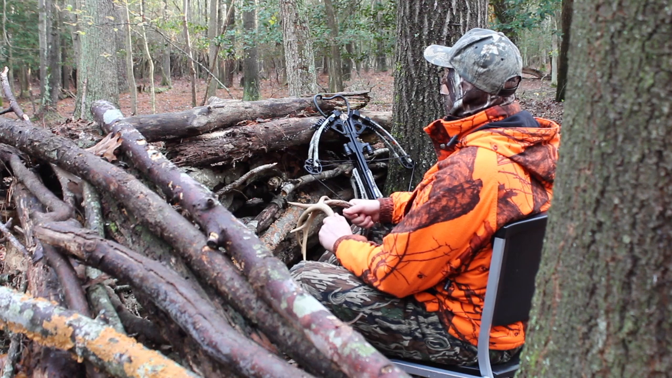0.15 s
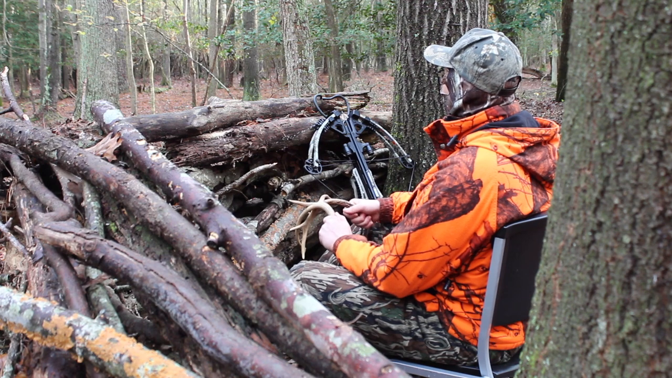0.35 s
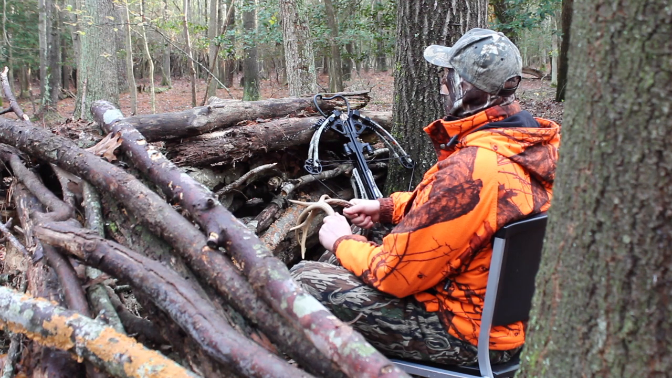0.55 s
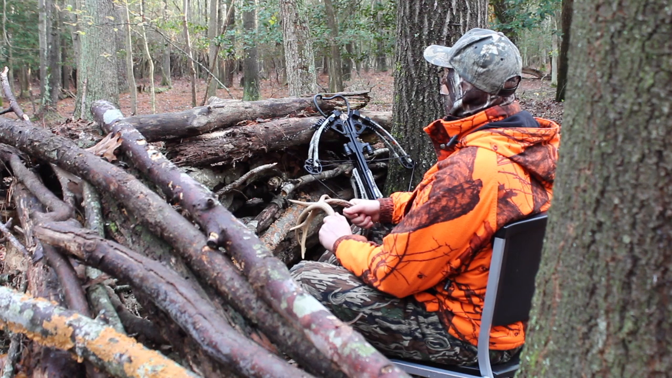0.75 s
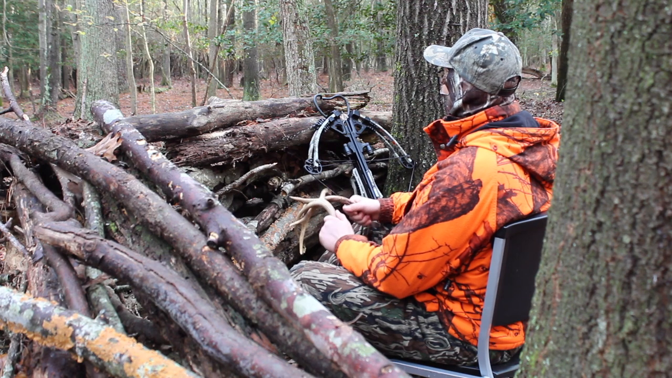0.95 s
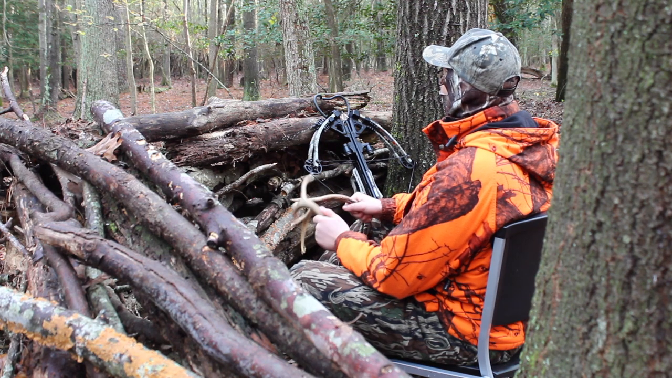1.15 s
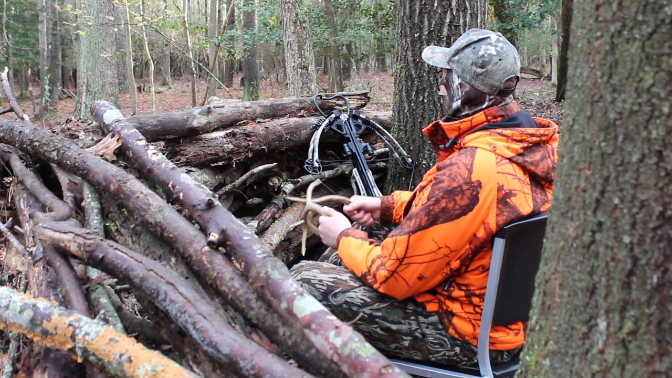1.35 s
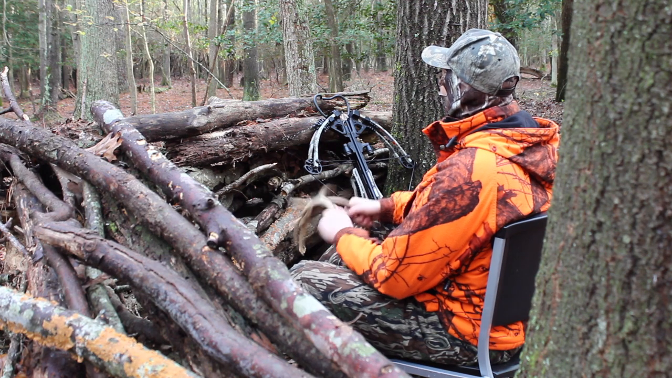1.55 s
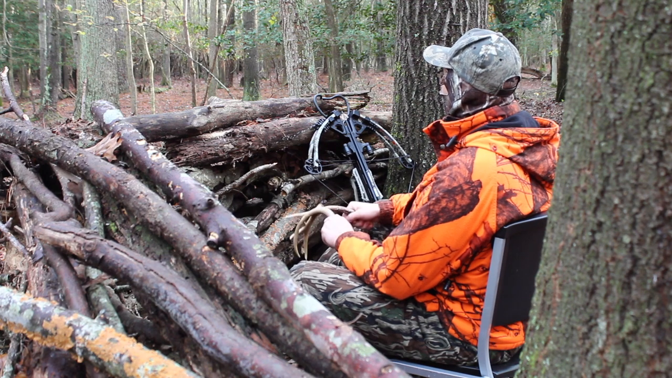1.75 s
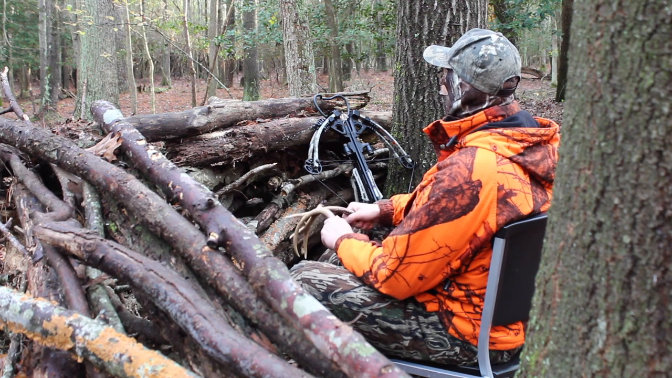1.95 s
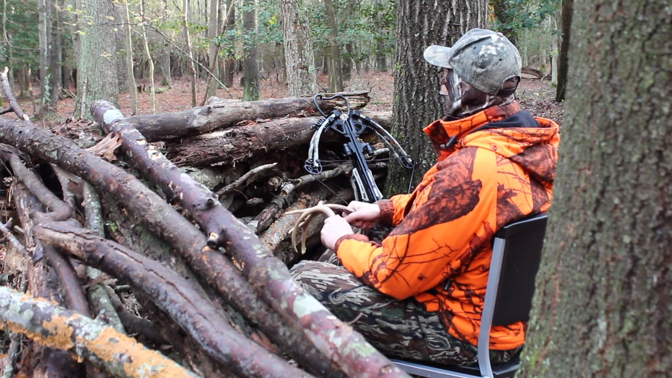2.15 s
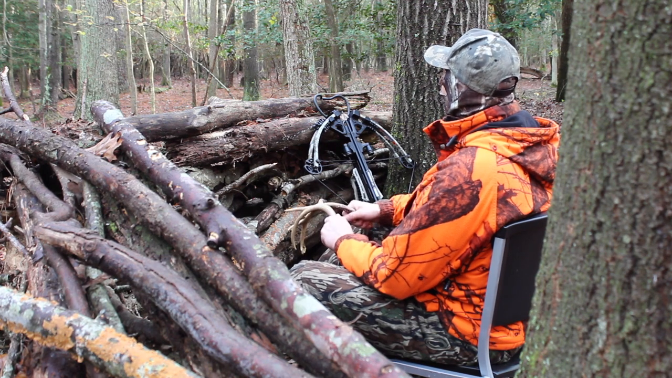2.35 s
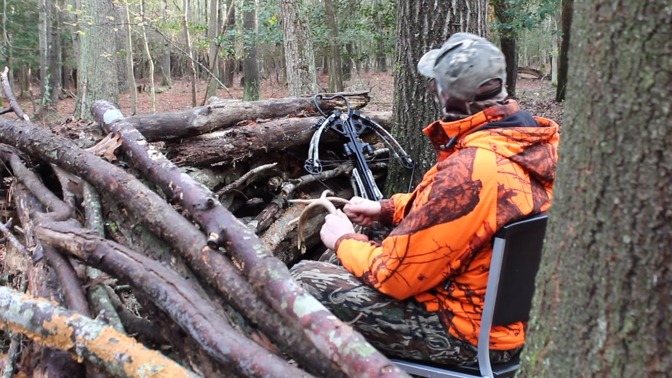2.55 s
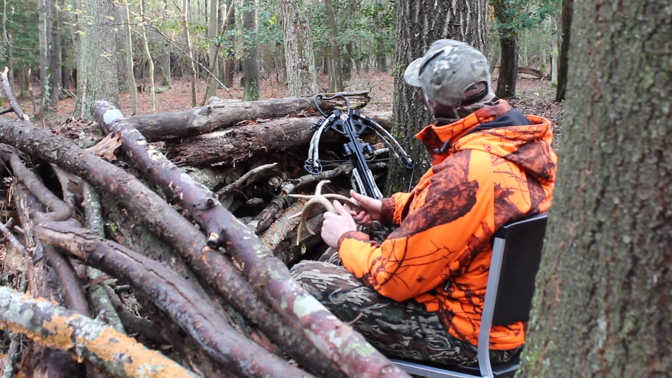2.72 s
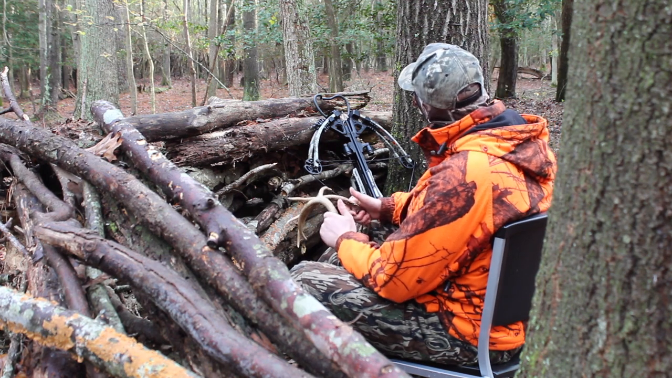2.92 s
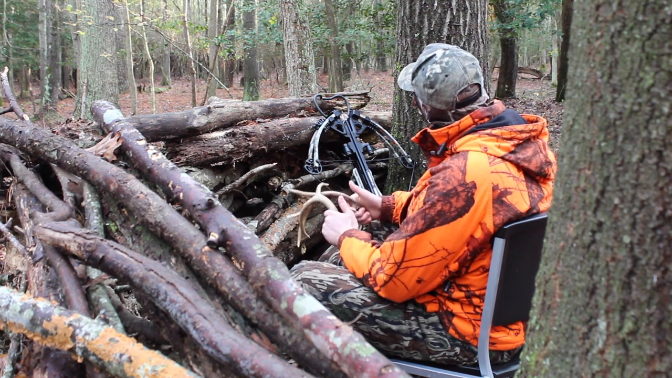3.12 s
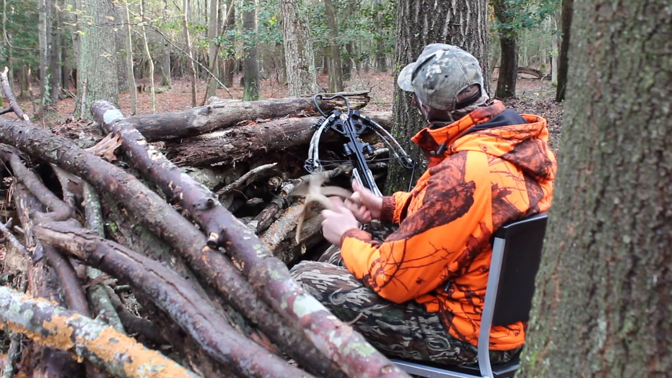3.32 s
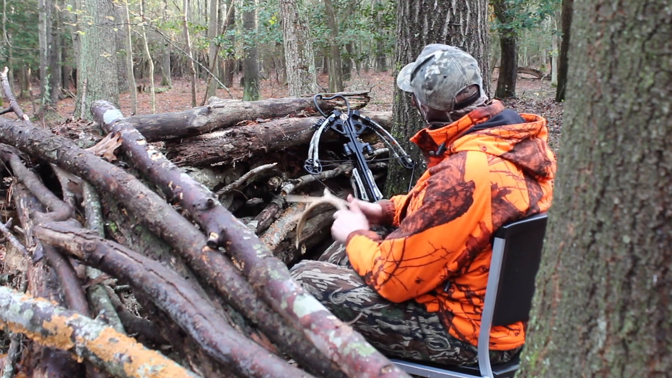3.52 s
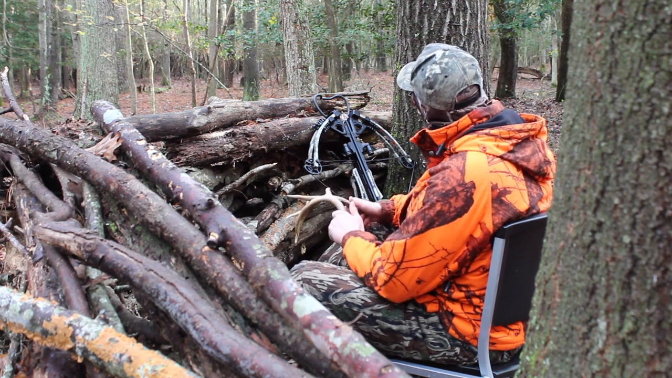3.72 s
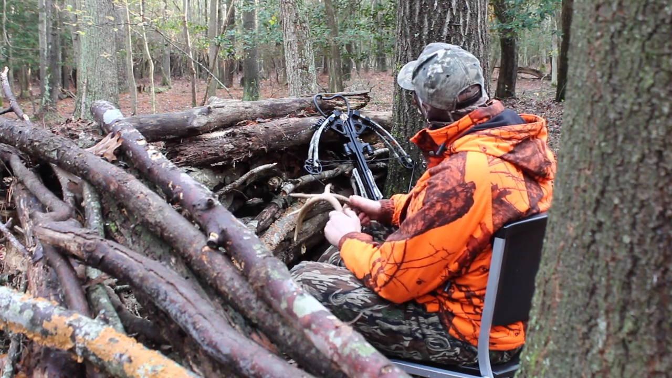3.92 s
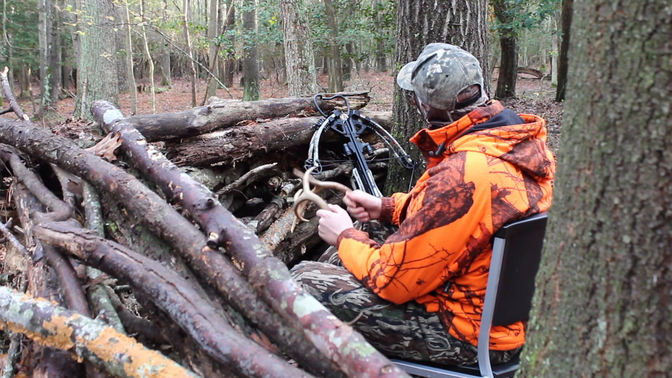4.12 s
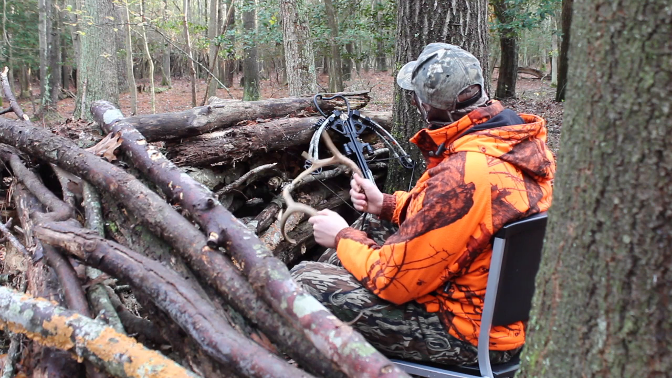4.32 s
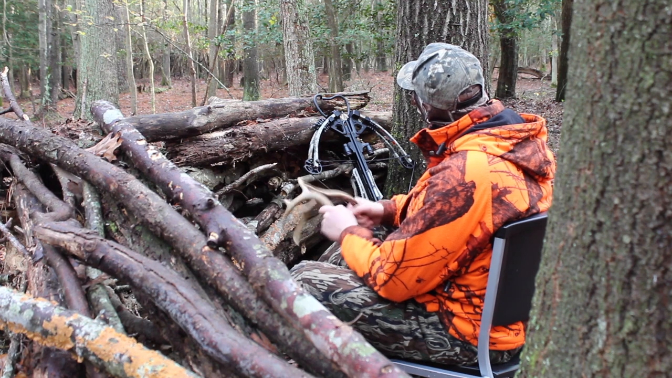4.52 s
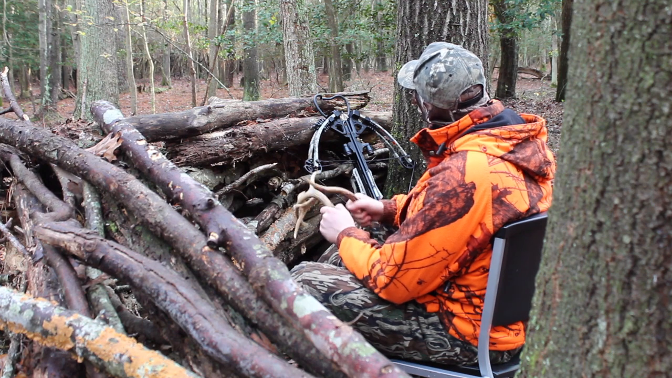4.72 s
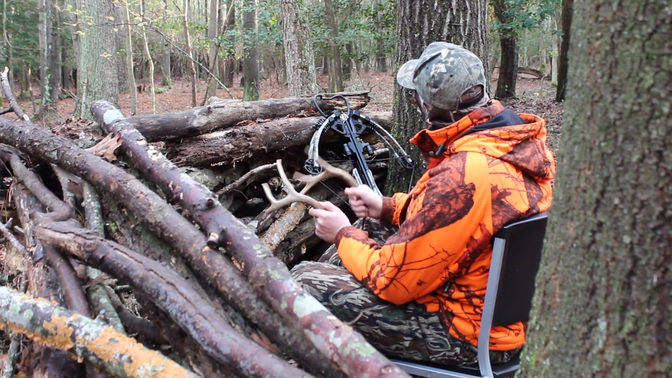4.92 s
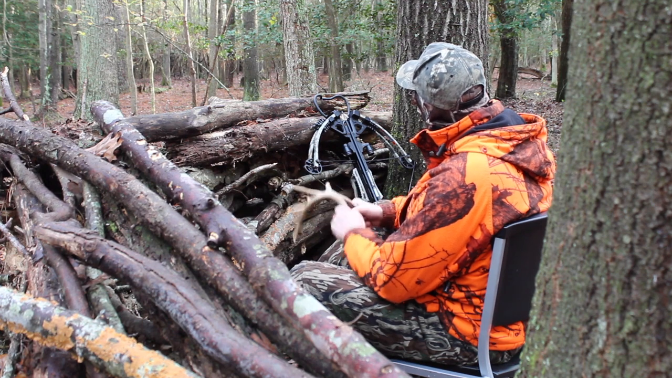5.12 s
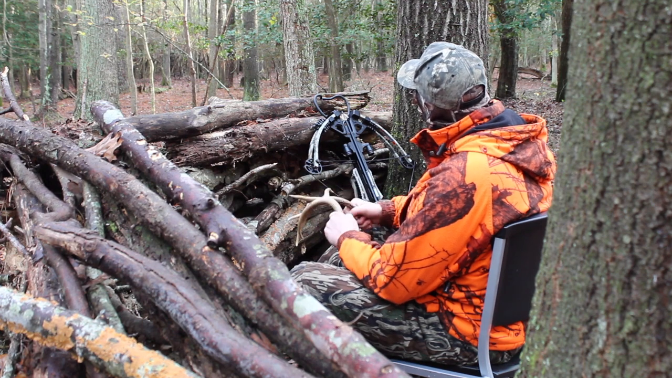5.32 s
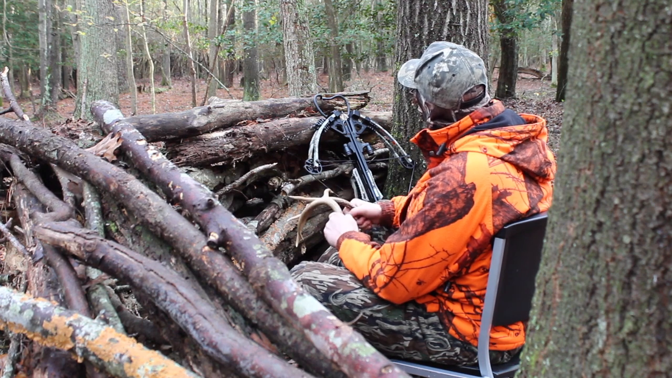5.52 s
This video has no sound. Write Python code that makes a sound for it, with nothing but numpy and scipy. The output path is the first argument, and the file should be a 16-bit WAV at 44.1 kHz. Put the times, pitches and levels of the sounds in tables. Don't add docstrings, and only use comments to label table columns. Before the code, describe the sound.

A quiet forest, picked up in mono with the antlers fairly close. For the first second there is only very soft road and leaf hush, a low passing rumble that fades after 0.6 s, and a tiny thin bird chip at 0.13 s. From 1.0 s antlers touch and slide faintly; clacks cluster at 1.3-1.4 s, with a stronger crack at 1.6 s. After a pause, lighter ticks come around 2.6 and 2.9 s, with a second, fainter chip. Clacks resume at 3.25 and 3.35 s, then a hard double at 3.5 s, lighter ones at 4.0 and 4.2 s, a strong cluster at 4.55 s with scrapes after it, and a softer tick at 4.8 s. The loudest, brightest burst lands at 5.14-5.2 s, then quiet to about 5.7 s. Each hit is dry, bony and brief, with scattered log reflections and a faint tree haze. A distant engine drone rises slightly after 3.6 s.

```python
import sys
import numpy as np
from scipy import signal
from scipy.io import wavfile
from scipy.ndimage import uniform_filter1d, minimum_filter1d

SR = 44100
rng = np.random.default_rng(int(sys.argv[2]) if len(sys.argv) > 2 else 0)


def nominal_scale(level):
    x = np.asarray(level, float) / 20
    return 10 ** x


def to_wav(s):
    ch = np.atleast_2d(s).T
    pcm = np.round(np.clip(ch, -1, 1) * 32767)
    wavfile.write(sys.argv[1], SR, pcm.astype(np.int16))


N = 250047


def at_hz(points, hz):
    table_hz, values = np.transpose(points)
    return np.interp(np.log(hz), np.log(table_hz), values)


def rms_one(x):
    return x / np.sqrt(np.mean(x ** 2) + 1e-20)


def band(x, low_hz, high_hz):
    edges_hz = [low_hz, min(high_hz, .45 * SR)]
    return signal.sosfilt(signal.butter(2, edges_hz, "band", fs=SR, output="sos"), x)


def dull(x, hz):
    return signal.sosfilt(signal.butter(6, hz, fs=SR, output="sos"), x)


def resonance(x, hz, width_hz):
    r = np.exp(-np.pi * width_hz / SR)
    top = (1 - r * r) / 2
    return signal.lfilter([top, 0, -top], [1, -2 * r * np.cos(2 * np.pi * hz / SR), r * r], x)


def drift(rate):
    r = np.exp(-80 * np.pi * rate / SR)
    slow = signal.lfilter([1], [1, -2 * r, r * r], rng.standard_normal(N // 40 + 2002))[2000:]
    return np.interp(np.arange(N) / 40, np.arange(len(slow)), rms_one(slow))


# mode_hz, width_hz, level_db
BONE_MODES = [(791, 110, -28), (1380, 29, -31.5), (1700, 33, -6), (2860, 170, 11.5), (3640, 510, -14.5),
              (4020, 16, 7), (5000, 360, 5), (5080, 110, 15), (6040, 79, -12.5), (6200, 210, 3.5),
              (6650, 720, 2), (6763, 44, 10), (8250, 170, 0), (8400, 150, -18.5), (9600, 78, -32),
              (9340, 86, -11), (10100, 65, -15), (10400, 240, -17.5), (11200, 100, -36),
              (11600, 150, -30.5)]


def bone(force, widen, spot_hz, focus_db):
    strengths_db = 4 * rng.standard_normal(len(BONE_MODES))
    ringing = 0
    for k, (hz, width_hz, db) in enumerate(BONE_MODES):
        level_db = db + strengths_db[k] - focus_db * np.log2(hz / spot_hz) ** 2
        sign = (-1) ** k
        ringing = ringing + sign * nominal_scale(level_db) * resonance(force, hz, widen * width_hz + 150)
    return ringing


# start_s, peak_db, tine_hz (loudest), thud_db (beam), dying_s (60 dB)
STRIKES = [(1.29, -29, 5470, -22, 0.02), (1.3349, -42, 3810, -7.5, 0.015),
           (1.3687, -16.5, 5080, -24.5, .018), (1.6053, -11, 4020, -19, 0.042),
           (2.5955, -33.5, 4076, -18, 0.011), (2.613, -22.5, 5200, -27, 0.018),
           (2.8799, -43, 3400, -13, 0.039), (3.2429, -16.5, 4870, -18.5, 0.04),
           (3.3543, -28, 5060, -33, 0.046), (3.4755, -23.5, 5860, -17, 0.049),
           (3.513, -7, 6420, -21, 0.023), (3.5142, -8.5, 6360, -32, 0.011),
           (4.0132, -22.5, 6830, -29, 0.023), (4.228, -29.5, 6590, -28, 0.027),
           (4.2464, -30, 6920, -20.5, .025), (4.5343, -9, 5100, -22.5, 0.03),
           (4.5557, -12, 4600, -26, 0.027), (4.5616, -15, 5800, -21, 0.057),
           (4.7854, -29.5, 4140, -17, 0.036), (5.1426, -8, 4750, -19.5, 0.034),
           (5.1445, 1, 6160, -28, 0.017), (5.1692, -16, 5110, -24, 0.014),
           (5.197, -15.5, 5700, -44.5, 0.013)]
# start_s, peak_db, tine_hz (loudest), thud_db (beam)
TOUCHES = [(1.046, -61, 3805, -1.5), (1.3813, -23, 6020, -17), (1.3856, -24.5, 3070, -26),
           (1.3962, -30.5, 3320, -20), (1.4028, -34, 3640, -8.5), (1.517, -51.5, 3500, -12.5),
           (1.588, -45, 2400, -5), (1.597, -52.5, 2600, -8.5), (1.62, -26, 5080, -4),
           (1.6304, -34, 2900, -17), (2.606, -54, 4070, -17), (2.715, -55.5, 4990, -11),
           (3.5175, -16.5, 3800, -14), (3.531, -25, 4240, -10.5), (4.0136, -32, 3970, -34.5),
           (4.027, -42, 3400, -35), (4.2259, -42, 4650, -14), (4.5354, -10.5, 6345, -33.5),
           (4.5738, -27.5, 4640, -18.5), (4.6231, -34.5, 3072, -4), (4.7108, -56, 5285, 1),
           (4.7195, -52, 2790, -0.5), (4.878, -41.5, 4360, -22.5), (5.147, -13, 6500, -29.5),
           (5.169, -25, 7500, -29.5), (5.175, -27, 5320, -20.5)]
# note_hz, level_db
BEAM_NOTES = [(1400, -1.5), (1790, -3.5), (2150, 2)]


def clacks():
    start_offset_s, touch_dying_s = .0006, 0.037
    out, energy, t, blow = np.zeros(N + 4000), np.zeros(N), np.arange(4000) / SR, 0
    for s, db, hz, thud_db, t60 in sorted(STRIKES + [(*row, touch_dying_s) for row in TOUCHES]):
        spread_db = 3.5 * np.minimum(rng.exponential(1, 4000), 3)
        echoes = rng.standard_normal(4000) * nominal_scale(spread_db - 19.0)
        force = echoes * nominal_scale(-60 * t / np.clip(t60, .006, .12))
        force[0] = 1

        modes = rms_one(band(bone(force, 0.13, hz, focus_db=-5.0), 3200, 6700))
        tine = nominal_scale(2.0) * rms_one(resonance(force, hz, 380))
        crack = nominal_scale(4.0) * rms_one(band(force * nominal_scale(-500 * t), 0.66 * hz, min(1.6 * hz, 8500)))
        body = band(dull(modes + tine + crack, 8600), 2200, 10000)

        notes = 0
        for beam_hz, level_db in BEAM_NOTES:
            notes = notes + nominal_scale(level_db + 5 * rng.standard_normal()) * resonance(force, beam_hz, 200)
        beam = rms_one(notes) + nominal_scale(0.5) * rms_one(band(force, 600, 3000))
        beam = band(band(beam, 370, 2800), 370, 2800)
        grip = rms_one(band(resonance(force, 420, 450), 250, 600))
        beam = beam + nominal_scale(-16 + .6 * db) * grip

        edge_db = -22 + 7 * np.log2(hz / 5000) + 0.17 * (db + 16)
        bright = band(force * nominal_scale(-1500 * t), 9300, 13000)
        edge = nominal_scale(edge_db + 4.0) * rms_one(dull(bright, 10000))
        first_contact = rms_one(band(force * nominal_scale(-2500 * t), 10500, 14000))
        edge = edge + nominal_scale(edge_db - 12.5) * first_contact

        hit = nominal_scale(db) * (body + nominal_scale(thud_db + 6.5) * beam + edge) / np.abs(body).max()
        at = round((s + start_offset_s) * SR)
        out[at:at + 4000] += hit
        blow = blow if at - blow < 300 else at
        energy[blow] += np.sum(hit ** 2)
    return out[:N], np.sqrt(energy)


# start_s, peak_db, note_hz, dying_s (60 dB)
KNOCKS = [(1.622, -42, 1040, 0.048), (3.2435, -47.5, 620, 0.049), (3.365, -53, 1630, 0.17),
          (3.515, -33, 2870, .02), (4.014, -37.5, 3400, 0.036), (4.229, -45, 3525, 0.033),
          (4.6235, -38.5, 1790, 0.023), (4.628, -49, 890, 0.075), (4.643, -48, 1400, .02),
          (1.606, -23.5, 3980, 0.022), (4.5352, -7.5, 4990, 0.016), (4.5349, -8.5, 7580, 0.0099),
          (4.562, -16.5, 5840, .02), (4.574, -27.5, 4830, 0.027), (5.143, -21, 1760, 0.033),
          (5.146, -41.5, 622, 0.035), (5.145, -14, 8050, .015)]


def knocks():
    out, taps, t = np.zeros(N), np.zeros(N), np.arange(4000) / SR
    for s, db, hz, t60 in KNOCKS:
        force = nominal_scale(-17 - 60 * t / t60) * rng.standard_normal(4000)
        force[0] = 1
        note = band(resonance(force, hz, 160 + 0.013 * hz), .6 * hz, 1.3 * hz)
        note = dull(note, 9000)
        note = nominal_scale(db) * note / np.abs(note).max()
        at = round(s * SR)
        out[at:at + 4000] += note
        taps[at] += np.linalg.norm(note)
    return out, taps


# start_s, end_s, level_db, first_hz, last_hz (colour)
SLIDES_IN = [(1.009, 1.056, -66, 3460, 4200), (1.028, 1.092, -63.5, 6000, 7260),
             (1.186, 1.226, -56, 5000, 6600), (1.2, 1.234, -50, 5600, 4300),
             (1.205, 1.232, -57, 2350, 2830), (1.556, 1.603, -58, 2980, 5210),
             (3.21, 3.242, -63, 6000, 4500), (3.479, 3.503, -43.5, 5460, 4924),
             (4.591, 4.622, -46, 4800, 2724), (4.688, 4.745, -65.5, 2430, 3400),
             (4.836, 4.871, -52, 2400, 4800), (4.866, 4.886, -55, 4440, 4500),
             (4.829, 4.871, -56, 2200, 2870)]
# start_s, end_s, level_db, first_hz, last_hz (colour)
SLIDES_OUT = [
    (1.062, 1.186, -67, 2760, 3000),
    (1.1, 1.155, -65, 4042, 4100),
    (3.362, 3.413, -50.5, 3260, 3700),
    (4.621, 4.663, -55.5, 2090, 1750),
]


def rubs():
    slips_per_s, slip_spread_db = 3500, 2
    rise_db, fall_db, let_go_db_per_s = 18.5, 19, 2800
    out = np.zeros(N)
    wander = .05 * drift(25)
    clumps_db = 2.2 * drift(120)
    colours_hz = np.geomspace(1700, 7500, 14)
    slides = [(row, True) for row in SLIDES_IN] + [(row, False) for row in SLIDES_OUT]
    for (start, end, db, first_hz, last_hz), swells in slides:
        i = np.arange(round(start * SR), round(start * SR) + 7000)
        done = np.clip((i / SR - start) / (end - start), 0, 1)
        spread_db = slip_spread_db * np.minimum(rng.exponential(1, len(i)), 3)
        sizes = rng.standard_normal(len(i)) * nominal_scale(spread_db)
        slope_db = rise_db * (1 - done) if swells else fall_db * done
        level_db = db - slope_db - let_go_db_per_s * np.maximum(i / SR - end, 0)
        slips = rms_one((rng.random(len(i)) < slips_per_s / SR) * sizes)
        slips = slips * nominal_scale(level_db + clumps_db[i])

        spot = np.log(first_hz + (last_hz - first_hz) * done) + wander[i]
        colour = 0
        for hz in colours_hz:
            nearness = nominal_scale(9 - 200 * (np.log(hz) - spot) ** 2)
            colour = colour + nearness * resonance(slips, hz, 360)
        hiss = band(slips, 1300, 8500)
        out[i] += colour + nominal_scale(-7) * hiss + nominal_scale(-8) * bone(slips, 0.52, 5000, focus_db=-1.5)
    return dull(out, 8600) + nominal_scale(-19.5) * band(out, 9200, 11500)


# band_hz, t60_s
FOREST_T60 = [(500, .4), (1500, 0.12), (4000, 0.91), (8000, 0.52), (14000, .35)]
# band_hz, gain_db
FOREST_GAIN = [(500, -45), (1500, -33.5), (2500, -36), (5000, -41.5), (8000, -35.5), (10000, -59),
               (12000, -68.5), (14000, -79.5)]
# mode_hz, width_hz, level_db
HAZE_MODES = [(4050, 75, 0), (5080, 62, 0), (5250, 120, -3), (6080, 220, -3), (6630, 62, -5),
              (7220, 82, -7)]


def forest(ticks):
    t, edges = np.arange(SR) / SR, 400 * 2 ** np.arange(0, 5.4, 1 / 3)
    white, tail = rng.standard_normal((2, SR)), 0
    for k, (low, high) in enumerate(zip(edges, edges[1:])):
        hz = np.sqrt(low * high)
        decay_db = at_hz(FOREST_GAIN, hz) - 60 * t / at_hz(FOREST_T60, hz)
        tail = tail + band(white[k % 2], low, high) * nominal_scale(decay_db)
    tail = tail * (1 - np.exp(-(t / 0.024) ** 2))
    tail = tail + sum(nominal_scale(db + 1) * resonance(tail, hz, width_hz + 90) for hz, width_hz, db in HAZE_MODES)
    tail = dull(tail, 12000)
    return signal.fftconvolve(ticks, nominal_scale(-13) * tail)[:N]


# start_s, level_db
CHIPS = [
    (0.126, -78),
    (2.9, -80),
]


def bird():
    top_hz, low_hz = 7380, 6300
    out, t = np.zeros(N), np.arange(round(.3 * SR)) / SR
    for s, db in CHIPS:
        pitch_hz = top_hz - (top_hz - low_hz) * np.exp(-t / .006)
        tone = np.sin(2 * np.pi * np.cumsum(pitch_hz) / SR)
        chip = tone * np.clip(t / .003, 0, 1) * nominal_scale(-250 * t)
        hiss = rng.standard_normal(len(t))
        line = resonance(resonance(hiss, top_hz, 180), top_hz, 180)
        line = rms_one(line) * nominal_scale(-6.5 - 17 * t)
        smear = rms_one(band(hiss, low_hz, top_hz)) * nominal_scale(-1.5 - 60 * t)
        fade = np.clip(t / 0.0054, 0, 1) * np.clip((.26 - t) / 0.046, 0, 1)
        at = round(s * SR)
        out[at:at + len(t)] += nominal_scale(db) * (chip + (line + smear) * fade)
    return out


# time_s, level_db
ENGINE = [
    (0, -93),
    (.5, -93),
    (.8, -94),
    (3.1, -94),
    (3.6, -86),
    (4.8, -85.5),
    (5.67, -83),
]


def drone():
    firing_hz = 69.3
    t = np.arange(N) / SR
    first_db = np.interp(t, *np.transpose(ENGINE))
    second_db = -83.5 - 15 * np.minimum(np.abs(t - 5.3) / .6, 1)
    rumble_db = -82.5 - 28 * np.maximum(t - 0.58, 0)
    phase = 2 * np.pi * np.cumsum(firing_hz * (1 + .01 * drift(1.5))) / SR
    first = nominal_scale(first_db + 4 + 2.0 * drift(3.7)) * np.sin(phase)
    second = nominal_scale(second_db + 5.0 + 2.5 * drift(6)) * np.sin(2 * phase)
    rumble = rms_one(band(rng.standard_normal(N), 77, 170))
    return first + second + nominal_scale(rumble_db) * rumble


# centre_hz, width_hz, level_db
HUMS = [(590, 110, -80), (2760, 150, -94)]


def machine_hums():
    out = 0
    for hz, width_hz, db in HUMS:
        hum = rms_one(resonance(rng.standard_normal(N), hz, width_hz))
        out = out + nominal_scale(db + 1.5 * drift(3)) * hum
    return out


# band_hz, density_db (dB per Hz)
AIR_SPECTRUM = [(13, -49), (22, -16.5), (76, -11), (108, -11), (135, -10), (203, -11.5), (239, -8),
                (315, -5), (342, -7.5), (592, -2), (997, -7), (1460, -11), (2030, -16), (8710, -27),
                (15500, -50)]


def air():
    out, edges = 0, 20 * 2 ** np.arange(0, 9.7, 1 / 3)
    white, together = rng.standard_normal((2, N + SR)), drift(2.8)
    for k, (low, high) in enumerate(zip(edges, edges[1:])):
        level_db = at_hz(AIR_SPECTRUM, np.sqrt(low * high))
        gain = nominal_scale(level_db + .45 * together + .9 * drift(4))
        out = out + gain * band(white[k % 2], low, high)[SR:]
    return nominal_scale(-71.5 + 2.5) * rms_one(out)


def scene():
    hits, ticks = clacks()
    notes, taps = knocks()
    rubbing = rubs()
    to_trees = nominal_scale(-3.5) * (ticks + taps) + nominal_scale(-10.5) * hits + nominal_scale(-17) * notes + nominal_scale(0.5) * rubbing
    antlers = hits + notes + rubbing + forest(to_trees)
    background = bird() + drone() + machine_hums() + air()
    return (antlers + background)[None]


def roll_off(x):
    return signal.sosfilt(signal.butter(12, 16060, fs=SR, output="sos"), x)


def record(dry):
    cut = signal.sosfilt(signal.cheby2(10, 60, 16200, fs=SR, output="sos"), dry)
    room_left = np.minimum(1, .95 / (np.abs(cut) + 1e-9))
    gain = uniform_filter1d(minimum_filter1d(room_left, size=61), size=31)
    return roll_off(gain * cut)


dry = scene()
out = record(dry)
to_wav(out)
```